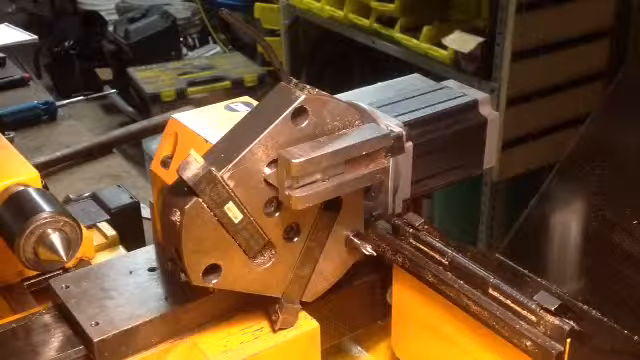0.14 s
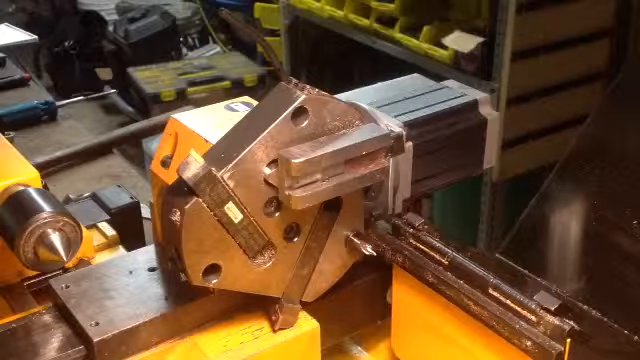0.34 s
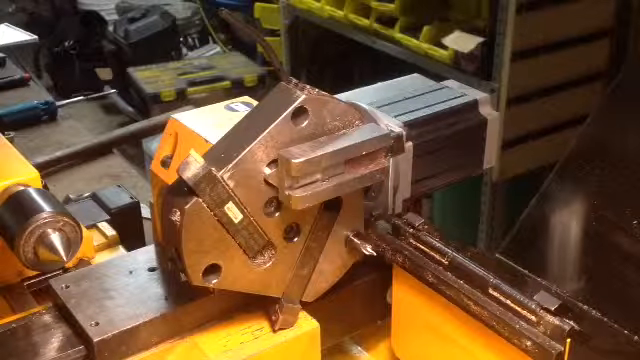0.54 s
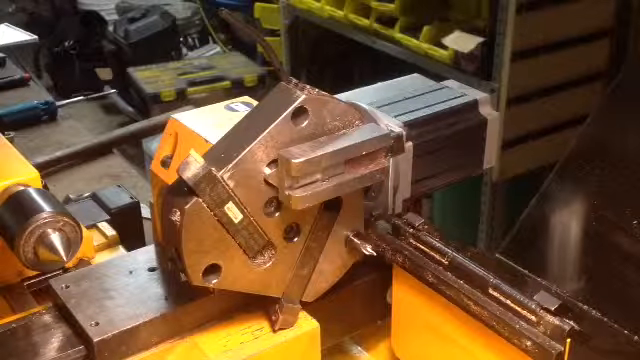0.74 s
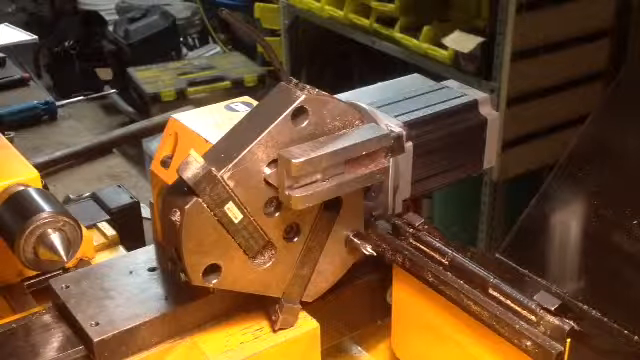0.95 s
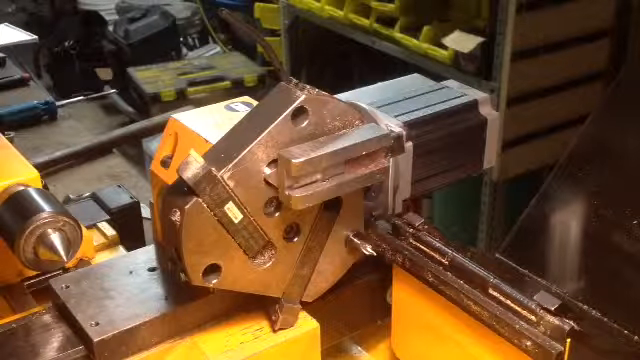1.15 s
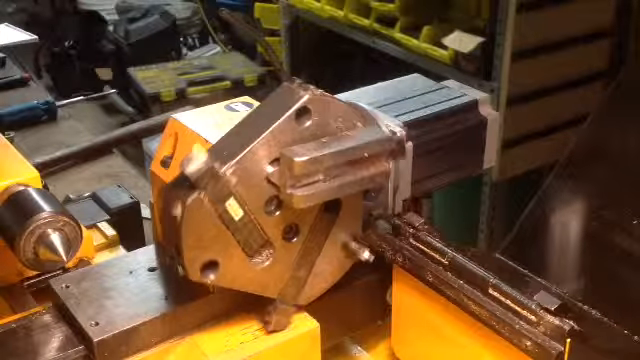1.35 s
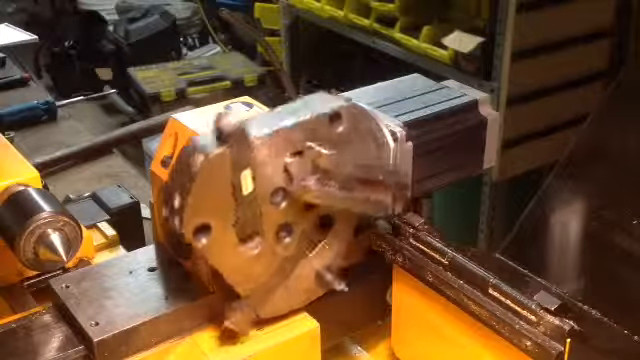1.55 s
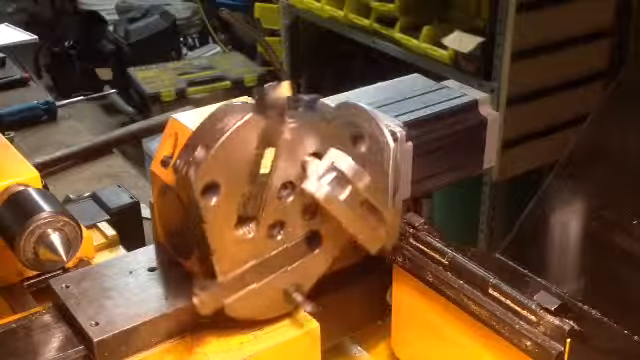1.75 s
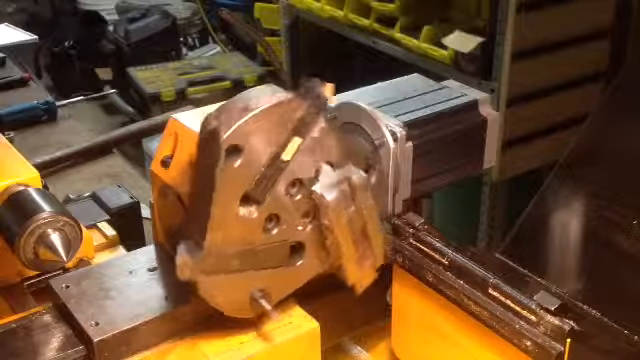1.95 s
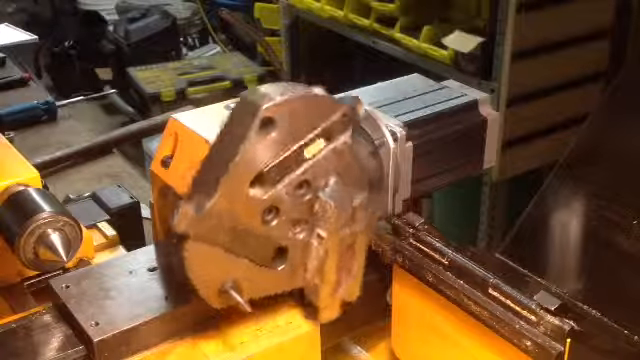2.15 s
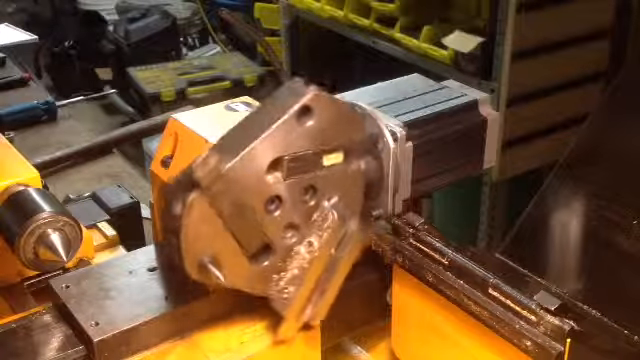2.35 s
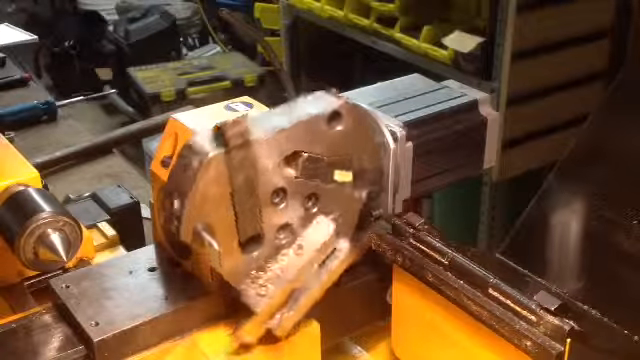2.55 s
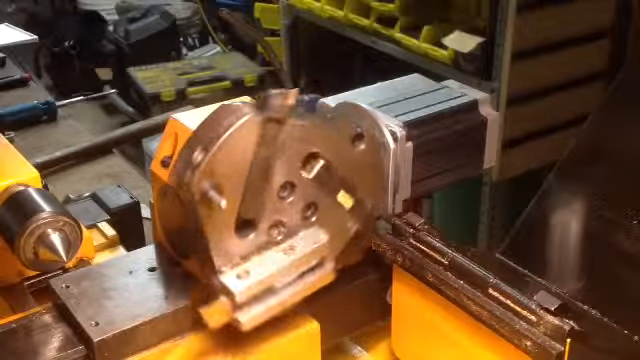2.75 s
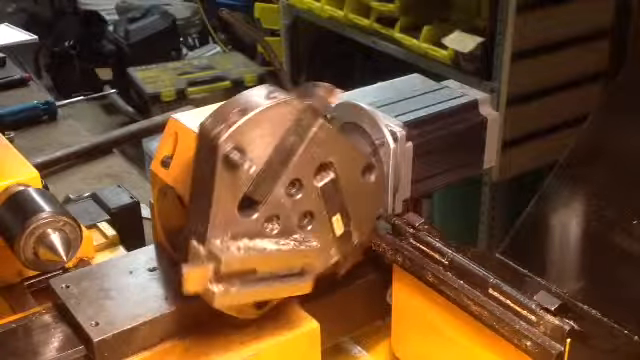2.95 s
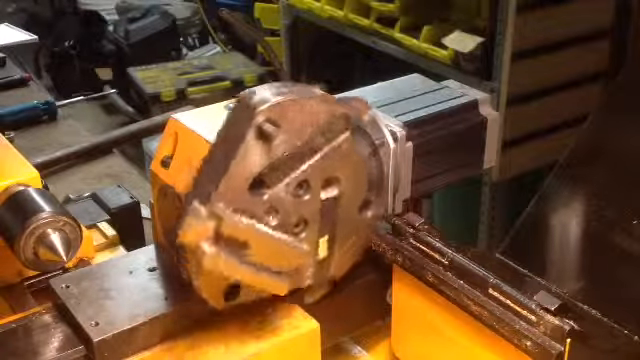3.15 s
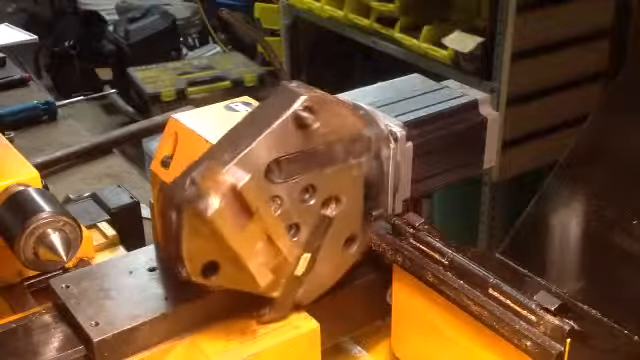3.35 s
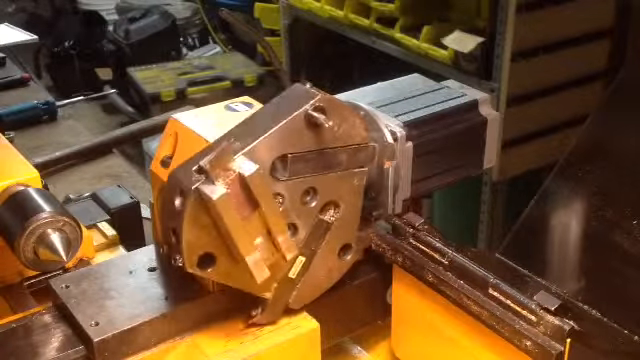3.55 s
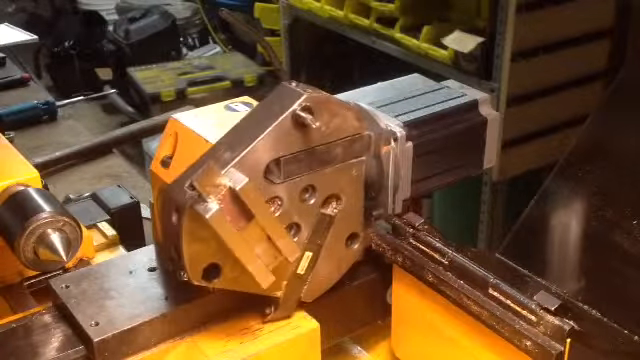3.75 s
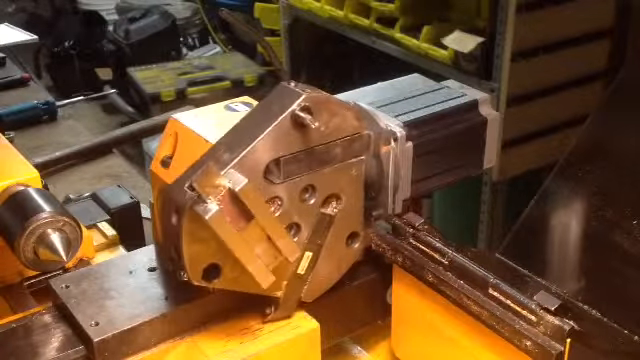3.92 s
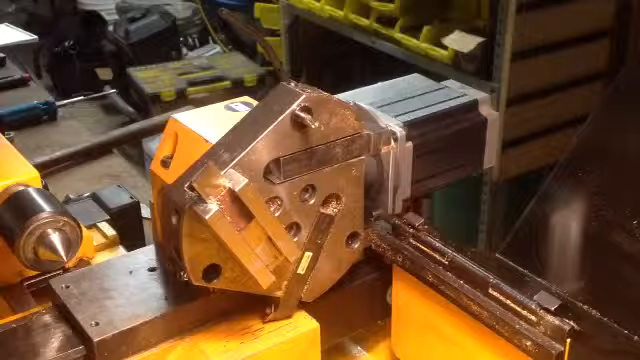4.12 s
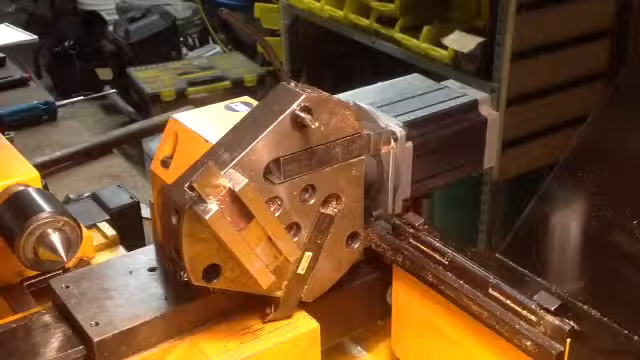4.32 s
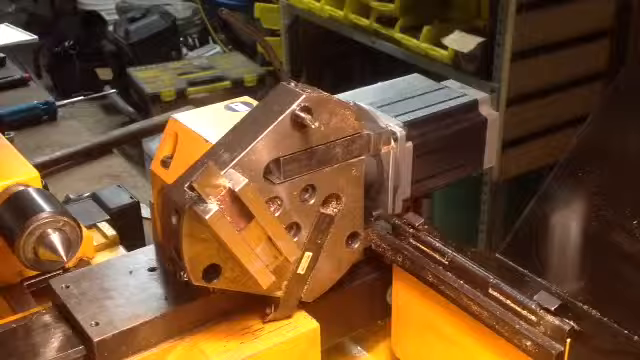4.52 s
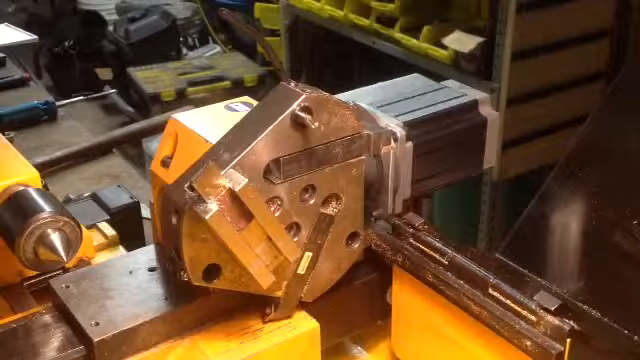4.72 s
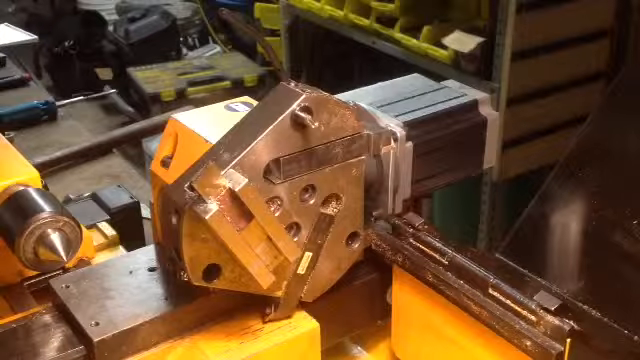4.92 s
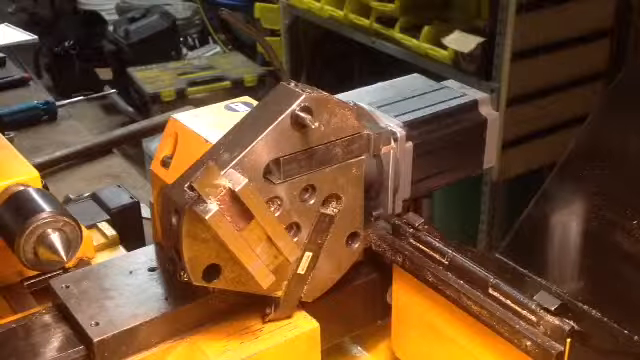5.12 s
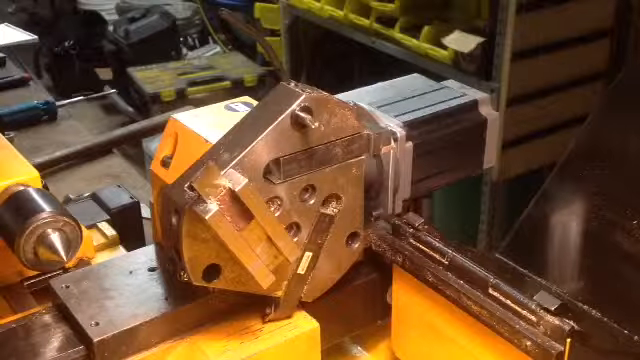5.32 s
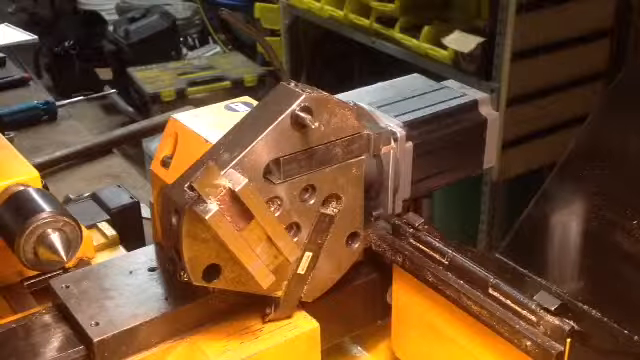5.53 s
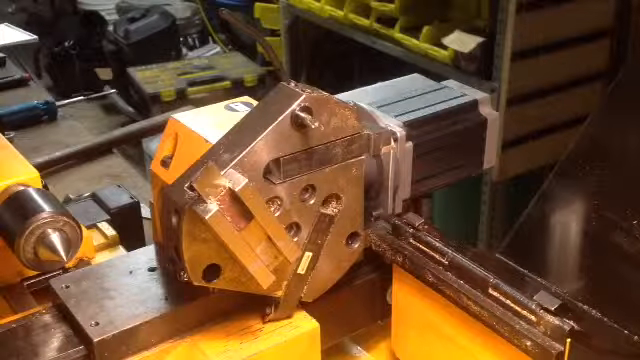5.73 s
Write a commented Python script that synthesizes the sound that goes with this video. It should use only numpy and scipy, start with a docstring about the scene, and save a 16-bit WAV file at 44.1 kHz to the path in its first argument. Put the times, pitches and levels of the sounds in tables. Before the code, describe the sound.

From 0 to 1.25 s, cooling fans give a steady, slightly throbbing hum around 250 and 500 Hz with soft air hiss; an idle motor adds a thin whistle near 10.5 kHz, and a few barely audible treble puffs pass. At about 1.27 s soft knocks mark the start: the motor sweeps up within 0.2 s to a constant, buzzy whine, strongest near 1 and 2 kHz, with gear growl and fine sizzle. Bright, scratchy pawl ticks drop at 1.84, 2.34, 2.85 and 3.35 s. It slows and jolts lightly at 3.5 s, then reverses into a louder, lower buzz near 330 Hz. From 3.78 to 3.9 s it stalls against the lock in a dense, hard, rattling clunk, the loudest event, with a short room tail. A faint very high hiss lasts to 4.7 s; fan hum continues to about 6 s, with a weak high whistle fading in and tapering.

```python
"""A stepper motor indexes a lathe's tool turret: it runs up, whines at a fixed step rate while a pawl ticks over the
ratchet, brakes, backs up slowly and stalls against the lock with a clunk. The whine is a sum of sines at multiples
of the coil rate; knocks and pawl are short rough pushes on resonances; gears and coils add coloured noise.
The driver's chopper whistles as a steady sine while the motor holds. Behind it, cooling fans hum (sines) and hiss
(filtered noise) in a small workshop, with a few faint puffs of treble noise."""
import sys
import numpy as np
from scipy import signal
from scipy.fft import rfft, irfft, next_fast_len
from scipy.io import wavfile
from scipy.ndimage import map_coordinates

SR = 44100
rng = np.random.default_rng(int(sys.argv[2]) if len(sys.argv) > 2 else 0)


def pcm_store(signal):
    """Save signal as 16-bit PCM."""
    levels = np.round(np.clip(np.atleast_2d(signal), -1, 1) * 32767)
    wavfile.write(sys.argv[1], SR, levels.astype(np.int16).T)


def field_ratio(decibels):
    """Amplitude ratio for a level in dB (20 dB per decade); scalars and array-likes work."""
    return 10 ** (np.asarray(decibels, dtype=float) / 20)


N = 254898
T = np.arange(N) / SR  # seconds

# The two moves of the motor. Each: start in seconds, stop in seconds, cruising coil rate in Hz, brakes (1) or stalls (0).
FORWARD_MOVE = (1.247, 3.532, 500.05, 1)
BACK_MOVE = (3.514, 3.9, 166.69, 0)
ACCEL_HZ_PER_S = 2850
RAMP_STEP_S = 0.016  # the controller changes speed in steps this long
LOCK_S, LOCK_RISE = 3.835, 1.068  # against the lock the coil rate rises by this factor
# Below these shares of cruising speed (first, second half of a move) the whine fades, by so many dB per unit share.
KNEE_UP, KNEE_DOWN, FADE_DB = 0.646, 0.39, 110.5
RAMP_DB, LOCK_DB = -0.5, 5.5  # change of the whine below cruising speed, and against the lock

# Partials of the whine. Each row: multiple of the coil rate, rms level at cruising speed in dB.
FORWARD_ORDERS = [(2, -62), (3, -76), (4, -56), (7, -77), (8, -78), (10, -77), (11, -80), (13, -77),
                  (14, -80), (15, -66), (16, -78), (17, -74), (18, -75), (19, -72), (20, -77), (21, -72),
                  (23, -74), (24, -70), (25, -75), (26, -66), (27, -79), (28, -71), (29, -77), (30, -68)]
BACK_ORDERS = [(2, -47), (4, -65), (8, -71), (13, -77), (14, -74), (16, -57), (20, -74), (21, -75),
               (22, -71), (28, -68), (34, -73), (40, -68), (42, -77), (43, -78), (44, -75), (45, -76),
               (47, -73), (54, -76), (55, -76), (57, -72), (58, -76), (64, -72), (66, -77), (67, -78),
               (68, -76), (69, -77), (75, -78), (90, -77)]
# Sidebands of the chopper tone. Each row: offset in multiples of the coil rate, rms level at cruising speed in dB.
FORWARD_SIDES = [(-7, -84), (-6, -84), (-4, -73), (-2, -79), (0, -69), (1, -82), (2, -83), (3, -86),
                 (4, -82), (5, -76), (6, -77), (9, -76)]
BACK_SIDES = [(-8, -77), (-6, -73), (-5, -79), (-4, -78), (-2, -77), (0, -74), (4, -78), (6, -78), (7, -78),
              (9, -77), (11, -79), (12, -73), (13, -71), (15, -64), (18, -75), (19, -79), (23, -76),
              (27, -75)]
# The driver's switching tone. Each entry: state of the motor, frequency in Hz.
CHOPPER_HZ = {"hold": 10535, "forward": 10588.6, "back": 10576.8}
# The holding whistle. Each row: start in seconds, end in seconds, rms level at start in dB, at end in dB.
HOLDS = [(-1, 1.262, -65.5, -65), (4, 4.6, -79.5, -78), (4.5, 6.5, -74.5, -82)]
# The stopped coils hiss until the driver eases off.
FULL_CURRENT_UNTIL_S, FULL_CURRENT_DB = 4.7, -65
# Colour of that hiss. Each row: frequency in Hz, relative density in dB.
COIL_HISS = [(12400, -39.5), (12700, 1), (13400, 1.5), (13700, -39)]

# Gear noise against speed. Each row: coil rate in Hz, rms growl in dB, rms rattle in dB, rms coil sizzle in dB.
GEARS = [(0, -49, -58, -68.5), (91.6, -40, -49, -59.5), (165.5, -56.5, -57.5, -57),
         (250, -51, -53.5, -51.5), (360, -47.5, -55.5, -59.5), (460, -50, -58.5, -51), (498, -53, -57, -64)]
# Colour of the gear rattle. Each row: frequency in Hz, relative density in dB.
MESH = [(500, -23), (900, -3.5), (1000, 3.5), (1080, -18.5), (1400, -12.5), (2100, -13), (2800, -12),
        (5000, -20), (8000, -18.5)]
# Colour of the coil sizzle. Each row: frequency in Hz, relative density in dB.
SIZZLE = [(2000, -13.5), (6000, -14), (8500, -14), (10000, -4), (10550, 1.5), (11100, -4.5), (12400, -12),
          (13000, 3.5), (13600, -17.5), (15500, -12.5)]

# Blows on the housing. Each row: start in seconds, push in dB (relative), length in seconds (four rise times),
# sizzle in dB (9.5 dB above the rms at its height).
KNOCKS = [(1.27, -27.5, 0.0019, -41.5), (1.278, -28.5, 0.0026, -38.5), (1.296, -28, 0.0044, -52),
          (3.495, -37.5, 0.00136, -50.5), (3.525, -31.5, 0.00137, -54), (3.777, -24, 0.0025, -58),
          (3.813, -20.5, 0.00185, -53), (3.82, -16, 0.00096, -48), (3.8245, -12.5, 0.00265, -44.5),
          (3.838, -18.5, 0.00099, -43.5), (3.851, -19, 0.00263, -45.5), (3.8605, -13, 0.00228, -34.5),
          (3.88, -16, 0.000674, -40.5), (3.887, -17, 0.00176, -60), (3.894, -25.5, 0.00237, -58.5)]
# Resonances of the housing. Each row: frequency in Hz, width in Hz, relative gain in dB.
HOUSING = [(148.3, 3.7, -15), (197.7, 128, -11.5), (316.3, 98.6, 1), (373.6, 68.7, -0.5), (533, 95, -2),
           (682, 53.3, -3.5), (884.3, 70.3, 0), (935.4, 85.5, -7.5), (1290, 615, -17.5), (1840, 190, -27.5)]
HIGH_MODES_DB = -1

# Drops of the pawl. Each row: start in seconds, push in dB (relative), extra push on the low modes in dB.
TICKS = [(1.265, -51, 18.5), (1.3192, -53, 19.5), (1.8374, -25.5, -4), (2.337, -26.5, 2),
         (2.8538, -25, -2.5), (3.3526, -26, 2.5), (3.7842, -45, 16), (3.8337, -42, 11), (3.861, -45, 14.5),
         (3.876, -43, 11)]
# Resonances of the pawl. Each row: frequency in Hz, width in Hz, relative gain in dB.
PAWL = [(1246, 257, -12), (1734, 160, -11.5), (2338, 190, -7.5), (2816, 207, -12), (3736, 390, -7),
        (4456, 133, 2), (4620, 142.5, 4), (4831, 245, 1), (5443, 300, -7), (6312, 84, -4),
        (7080, 254, -13.5), (8940, 960, -18.5), (10660, 600, -20), (13400, 970, -24)]
CONTACT_S, CHATTER_S, CHATTER_DB = 0.001432, 0.00494, -16
# The pawl chatters at the start, the reversal and the lock.
# Each row: start in seconds, end in seconds, push in dB (relative).
CLATTERS = [(1.261, 1.342, -65), (3.463, 3.57, -62), (3.825, 3.901, -53.5)]
CLATTER_PER_S, CLATTER_SPREAD_DB, CLATTER_BLUNT_DB = 530, 0.5, 8.5

FAN_HZ = 126.72  # blade rate
# Blade tones. Each row: multiple of the blade rate, rms level in dB.
FAN = [(3, -63), (4, -43), (5, -72), (6, -62), (7, -67), (8, -68), (9, -69), (11, -72.5), (14, -78),
       (16, -83), (18, -82)]
# Mains hum and further fans. Each row: frequency in Hz, rms level in dB.
OTHER_TONES = [(120.0, -74), (168.9, -80), (197.8, -73), (282.3, -66), (331.2, -68), (471.3, -73),
               (549.1, -72), (591.3, -73), (796.1, -77), (4148.2, -82), (8319.7, -86), (12750.2, -79)]
BEAT_HZ, BEAT_GAP_HZ = 246.75, 6.7
# Rush of air. Each row: frequency in Hz, relative density in dB.
AIR = [(40, -53), (70, -35), (110, -18.5), (145, -17), (200, -12.5), (400, -10), (800, -14), (1250, -16.5),
       (3200, -17.5), (5000, -23), (7500, -28.5), (11800, -34), (13900, -33.5), (15300, -37), (15600, -67)]
# Fan housings. Each row: frequency in Hz, width in Hz, gain added to the plain rush in dB.
AIR_BUMPS = [(471.4, 72, -1.5), (280.4, 27.6, 4), (740.5, 102, -1.5), (905.2, 24, -0.5), (4154, 126, -1),
             (13030, 410, 9.5)]

# Faint treble puffs. Each row: start in seconds, level in dB (9.5 dB above the rms at its height),
# length in seconds (three rise times).
PUFFS = [(0.287, -36, 0.0078), (0.455, -44, 0.0153), (0.632, -40, 0.0117), (4.241, -44, 0.0113),
         (4.405, -42.5, 0.0208), (5.246, -39, 0.0132), (5.404, -51.5, 0.012)]
# Colour of the puffs. Each row: frequency in Hz, relative density in dB.
PUFF = [(3000, -8.5), (6000, 0), (9000, -1.5), (12000, -0.5), (15500, -4)]
# Decay of the workshop. Each row: frequency in Hz, time to fall by 60 dB in seconds.
SHOP = [(200, 0.516), (2000, 0.16), (10000, 0.206)]


def unit(x):
    """Normalization: the signal scaled to rms 1."""
    return x / np.sqrt(np.mean(x ** 2) + 1e-20)


def along(points, hz):
    """Interpolation of (Hz, value) points along a logarithmic frequency axis."""
    f, v = np.transpose(points)
    return np.interp(np.log(hz + 1), np.log(f + 1), v)


def wobble(rate, size=N):
    """Slow random modulation: a smooth curve through random knots, rate of them a second."""
    coarse = T[:size + 32:32]
    knots = rng.standard_normal(int(size * rate / SR) + 4)
    return np.interp(T[:size], coarse, map_coordinates(knots, [coarse * rate]))


def filtered(x, response):
    """Linear filtering: the spectrum multiplied by a complex response of frequency."""
    m = next_fast_len(N + SR // 2)
    return irfft(rfft(x, m) * response(np.fft.rfftfreq(m, 1 / SR)), m)[:N]


def hiss(spectrum):
    """Coloured noise: white noise shaped by (Hz, dB) points, at rms 1."""
    return unit(filtered(rng.standard_normal(N), lambda hz: field_ratio(along(spectrum, hz))))


def resonances(modes):
    """Modal superposition: damped resonances (Hz, width, dB) of alternating sign form a causal response."""
    def mode(f, c, w, db):
        return field_ratio(db) * 1j * f * w / (c * c - f * f + 1j * f * w)
    return lambda f: sum((-1) ** k * mode(f, *row) for k, row in enumerate(modes))


def tone(cycles, db):
    """Simple harmonic motion: a sine of the given rms level and random starting phase."""
    return np.sqrt(2) * field_ratio(db) * np.sin(2 * np.pi * (cycles + rng.random()))


def gate(start, stop, fade):
    """Linear envelope: 1 between two moments, with soft edges."""
    return np.clip((T - start) / fade, 0, 1) * np.clip((stop - T) / fade, 0, 1)


def swell(start, db, rise):
    """Pulse envelope u exp(1 - u): a bump that peaks after the rise time and falls more slowly."""
    bump, span = np.zeros(N), slice(int(start * SR), int((start + 20 * rise) * SR))
    u = np.clip(T[span] - start, 0, None) / rise
    bump[span] = field_ratio(db) * u * np.exp(1 - u)
    return bump


def speed(move):
    """Uniform acceleration: coil rate climbs evenly to cruising speed, then brakes evenly or stalls."""
    start, stop, cruise_hz, brakes = move
    down = ACCEL_HZ_PER_S * (stop - T) if brakes else cruise_hz
    rate = np.clip(np.minimum(ACCEL_HZ_PER_S * (T - start), down), 0, cruise_hz) * (T < stop)
    return rate * np.where((T > LOCK_S) & (not brakes), LOCK_RISE, 1)


def whine(move, orders, sides, chopper_hz, smear):
    """Periodic forcing: coil current pulls at multiples of its rate and spreads the chopper tone into sidebands."""
    start, stop, cruise_hz, _ = move
    span = slice(int(start * SR), int(stop * SR))
    t, smooth, out = T[span], speed(move)[span], np.zeros(N)
    rate = np.interp(np.round(t / RAMP_STEP_S) * RAMP_STEP_S, t, smooth)
    turns = np.cumsum(rate) / SR
    knee = np.where(t < t.mean(), KNEE_UP, KNEE_DOWN)
    pull_db = -FADE_DB * np.clip(knee - smooth / cruise_hz, 0, None)
    pull_db += RAMP_DB * (rate < cruise_hz) + LOCK_DB * (rate > cruise_hz)
    off = abs(1 - rate / cruise_hz)
    # the rotor hunts while the speed changes and most against the lock; high orders fade
    rough_db = 1.4 + 4 * np.sqrt(off) + 4 * (rate > cruise_hz)
    for k, db in orders:
        out[span] += tone(k * turns, db + pull_db - smear * k * off + rough_db * wobble(40, size=len(t)))
    for k, db in sides:
        out[span] += tone(chopper_hz * t + k * turns, db - 40 * off + wobble(30.1, size=len(t)))
    return gate(start, stop, 0.032) * out


def holding():
    """Magnetostatic holding: the chopped current whistles, and the stopped coils hiss at full current."""
    held = sum(gate(a, b, 0.018) * field_ratio(np.interp(T, (a, b), (from_db, to_db))) for a, b, from_db, to_db in HOLDS)
    whistle = held * tone(CHOPPER_HZ["hold"] * T, 0.77 * wobble(23))
    full_current = gate(BACK_MOVE[1], FULL_CURRENT_UNTIL_S, 0.0196) * field_ratio(FULL_CURRENT_DB)
    return whistle + full_current * hiss(COIL_HISS)


def gears():
    """Speed-dependent friction: growl through the case, rattle, and coil sizzle that flares at each jolt."""
    rate = speed(FORWARD_MOVE) + speed(BACK_MOVE)
    at_hz, *levels = np.transpose(GEARS)
    running = gate(FORWARD_MOVE[0], BACK_MOVE[1], 0.0167)
    growl_gain, rattle_gain, sizzle_gain = [running * field_ratio(np.interp(rate, at_hz, db)) for db in levels]
    case = resonances(HOUSING[1:4])
    # the extra square root sharpens the case resonances
    case_noise = filtered(rng.standard_normal(N), lambda f: case(f) * np.sqrt(abs(case(f))))
    growl = growl_gain * field_ratio(0.82 * wobble(40)) * unit(case_noise)
    rattle = rattle_gain * field_ratio(0.94 * wobble(29.33)) * hiss(MESH)
    flares = sum(swell(s, db - 9.5, 0.0035) for s, _, _, db in KNOCKS)
    sizzle = (sizzle_gain * field_ratio(2.8 * wobble(14) + 0.8 * wobble(60)) + flares) * hiss(SIZZLE)
    return growl + rattle + sizzle


def motor():
    """Superposition of the motor's sources: whine both ways, holding, gears and a ringing bracket."""
    forward = whine(FORWARD_MOVE, FORWARD_ORDERS, FORWARD_SIDES, CHOPPER_HZ["forward"], smear=1.5)
    back = whine(BACK_MOVE, BACK_ORDERS, BACK_SIDES, CHOPPER_HZ["back"], smear=0.68)
    # a bracket rings as the motor reaches speed
    bracket = swell(1.43, -58.5, 0.031) * tone(2100 * T, 2.5 * wobble(31.2))
    return forward + back + bracket + holding() + gears()


def knocks():
    """Impulsive excitation: each blow is a short, slightly rough push on the housing's resonances."""
    grit = 1 + 0.424 * rng.standard_normal(N)
    blows = sum((-1) ** k * swell(s, db - 9, length / 4) for k, (s, db, length, _) in enumerate(KNOCKS))
    pushes = grit * blows
    low = filtered(pushes, resonances(HOUSING[:5]))
    high = filtered(pushes, resonances(HOUSING[5:]))
    ring = low - field_ratio(HIGH_MODES_DB) * high
    # the small case radiates little deep bass
    return 9 * filtered(ring, lambda f: (1j * f / (1j * f + 90)) ** 4)


def pawl():
    """Contact noise exciting modes: a scratchy drop over a tooth, then dying chatter; blunt ones favour low modes."""
    scratch = rng.standard_normal(N)
    shapes = [swell(s, db, CONTACT_S / 2) + swell(s, db + CHATTER_DB, CHATTER_S) for s, db, _ in TICKS]
    blunt = sum(field_ratio(low_db) * shape for (_, _, low_db), shape in zip(TICKS, shapes))
    low = filtered(blunt * scratch, resonances(PAWL[:4]))
    high = filtered(sum(shapes) * scratch, resonances(PAWL[4:]))
    return 5 * (low + high)


def clatter():
    """Random impact process: dense blunt contacts excite the pawl while the drive jolts."""
    when, size, scratch = rng.random(N), rng.standard_normal(N), rng.standard_normal(N)
    level = sum(field_ratio(db) * gate(start, end, 0.0166) for start, end, db in CLATTERS)
    contacts = (when < CLATTER_PER_S / SR) * field_ratio(CLATTER_SPREAD_DB * size) * level
    shape = signal.fftconvolve(contacts, swell(0, 0, CONTACT_S / 2)[:SR // 20])[:N]
    low, high = resonances(PAWL[1:5]), resonances(PAWL[7:11])
    return 5 * filtered(shape * scratch, lambda f: field_ratio(CLATTER_BLUNT_DB) * low(f) + high(f))


def fans():
    """Blade-passing tones waver over turbulent air in the housings; three close tones near 250 Hz beat."""
    blades = sum(tone(k * FAN_HZ * T + 0.00545 * k * wobble(12), db + 0.898 * wobble(38)) for k, db in FAN)
    others = sum(tone(hz * T, db + 2.2 * wobble(9)) for hz, db in OTHER_TONES)
    spin = 2 * np.pi * BEAT_HZ * T
    throb = field_ratio(-54.0) * np.sin(spin) + field_ratio(-52.0) * np.cos(spin) * np.cos(2 * np.pi * BEAT_GAP_HZ * T)

    def housings(f):
        return 1 + sum(field_ratio(db) / (1 + (2 * (f - c) / w) ** 2) for c, w, db in AIR_BUMPS)
    rush = field_ratio(-53 + 0.26 * wobble(1.907)) * unit(filtered(hiss(AIR), housings))
    return blades + others + throb + rush


def puffs():
    """Amplitude-modulated noise: faint brief puffs of treble."""
    return hiss(PUFF) * sum(swell(s, db - 9.5, length / 3) for s, db, length in PUFFS)


def shop(x):
    """Reverberation: convolution with noise in which each frequency decays at its own rate."""
    hz, t, z = signal.stft(rng.standard_normal(SR // 2), SR, nperseg=256)
    tail = signal.istft(z * field_ratio(-60 * t / along(SHOP, hz)[:, None]), SR, nperseg=256)[1]
    delayed = np.pad(x, (200, 0))  # samples
    return signal.fftconvolve(delayed, tail / np.linalg.norm(tail))[:N]


def scene():
    """Superposition: the hits with their room tail over motor, fans and puffs."""
    hits = knocks() + pawl() + clatter()
    return (hits + field_ratio(-11) * shop(hits) + motor() + fans() + puffs())[None]


def band_limit(x):
    """A steep low-pass at the top of the band."""
    return signal.sosfilt(signal.butter(12, 15710, fs=SR, output="sos"), x)


def record(dry):
    """Band limiting: the microphone cuts the deep bass, and nothing from 15.4 kHz up passes."""
    mix = filtered(dry[0], lambda hz: (1j * hz / (1j * hz + 60)) ** 2 * (hz < 15400))
    return band_limit(mix[None])


dry = scene()
out = record(dry)
pcm_store(out)
```